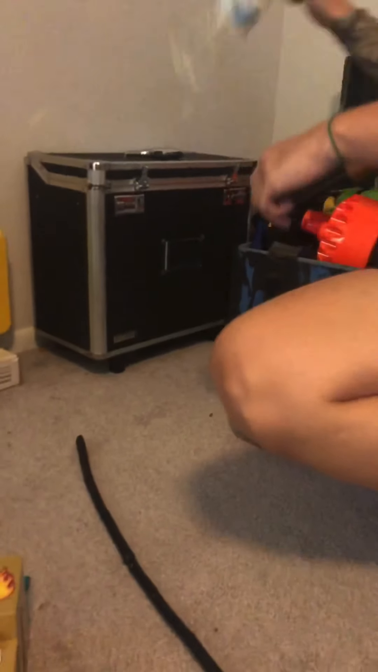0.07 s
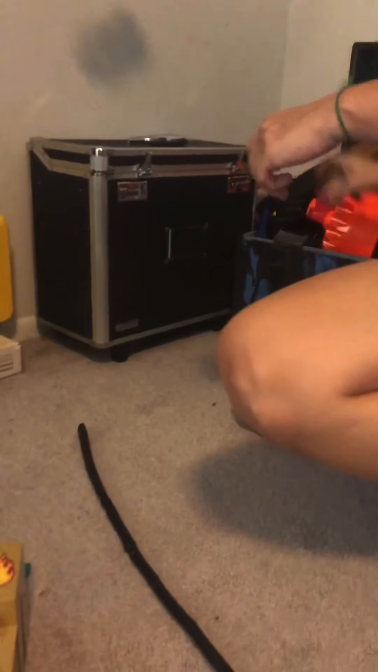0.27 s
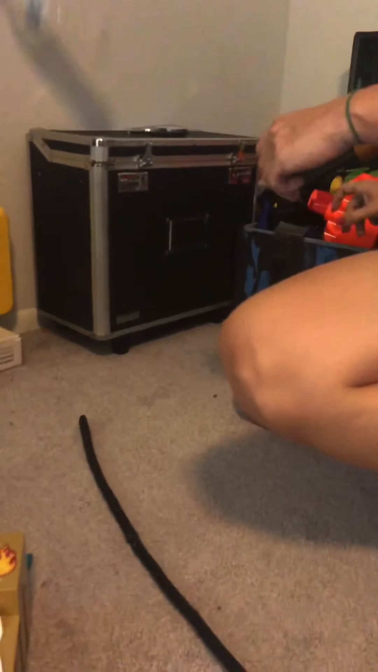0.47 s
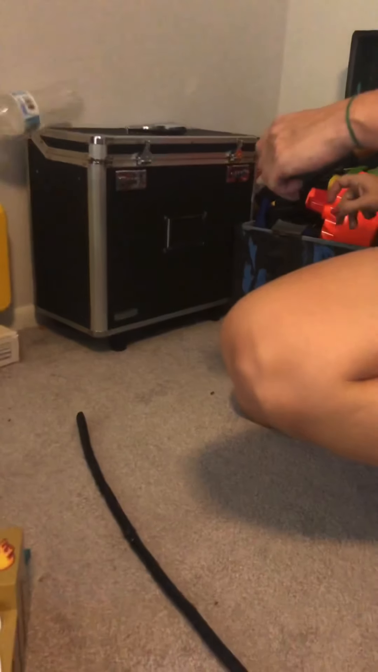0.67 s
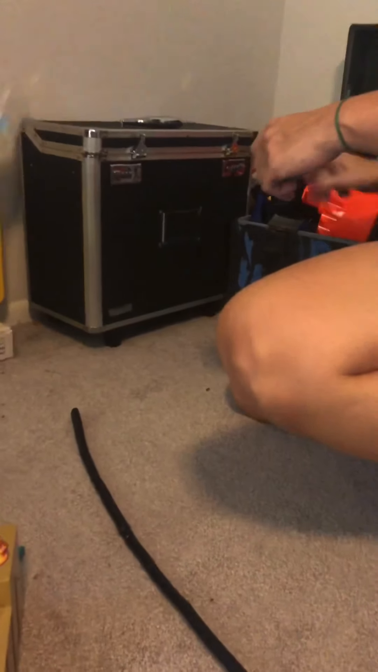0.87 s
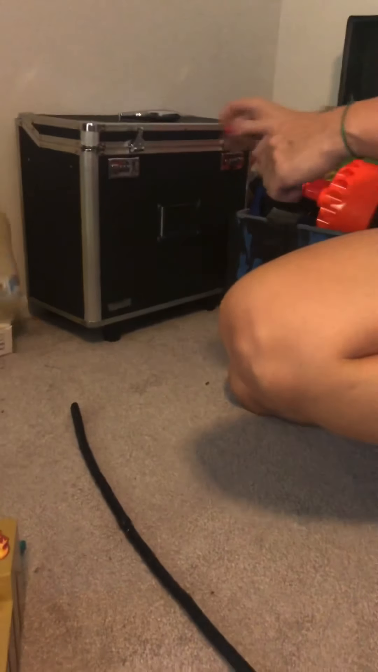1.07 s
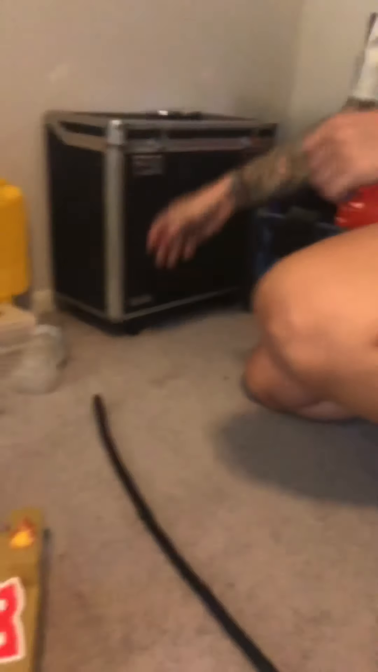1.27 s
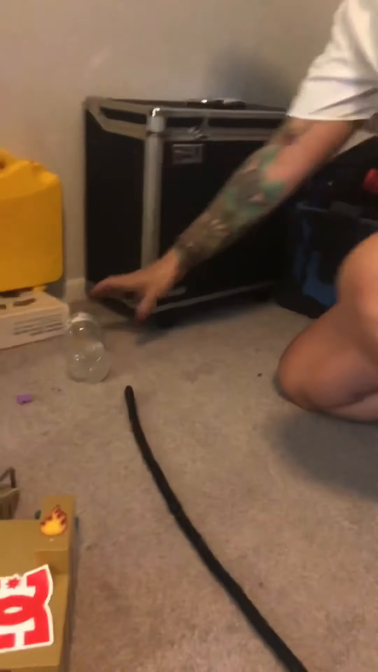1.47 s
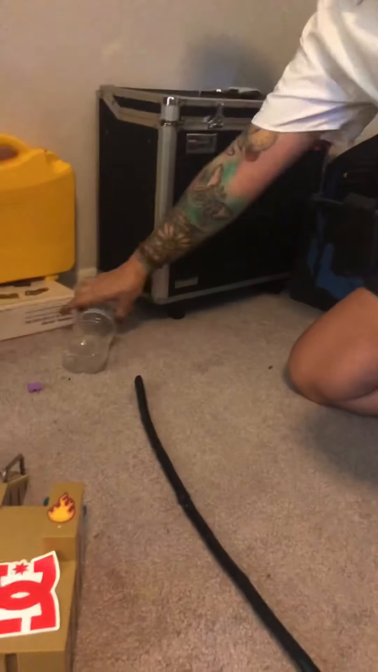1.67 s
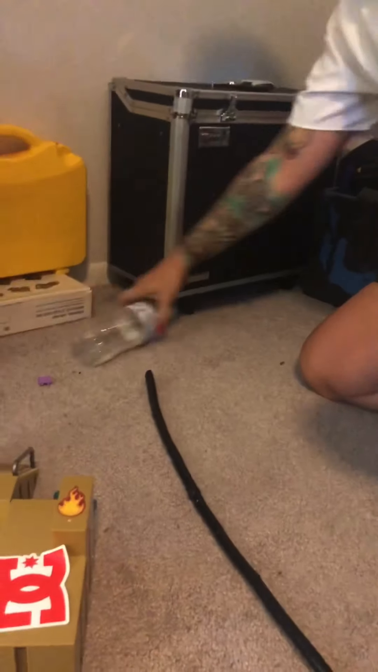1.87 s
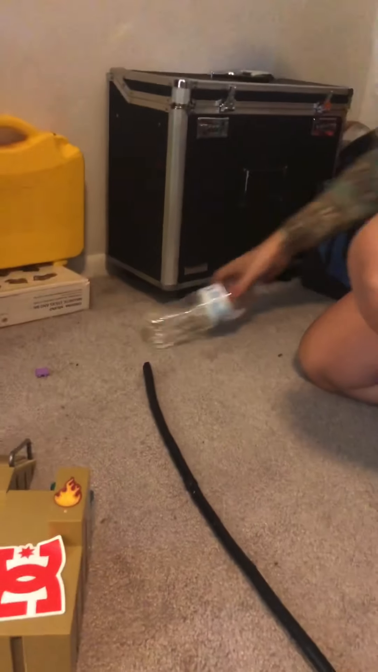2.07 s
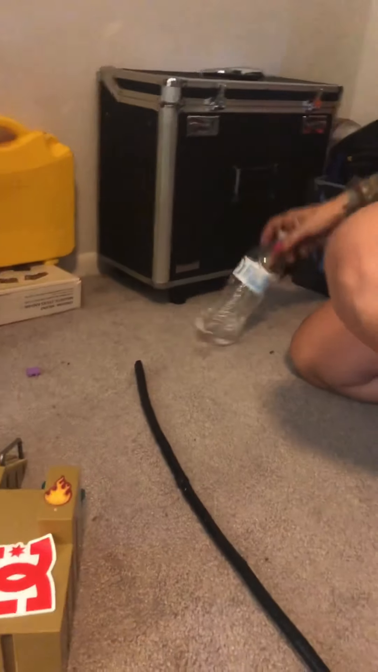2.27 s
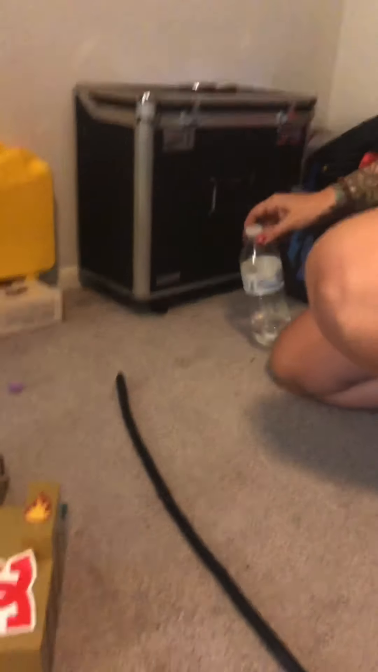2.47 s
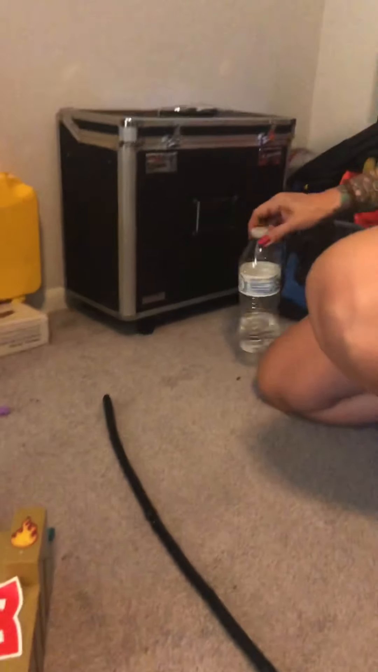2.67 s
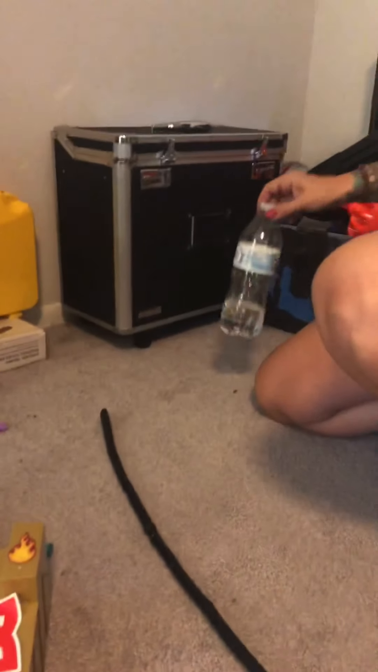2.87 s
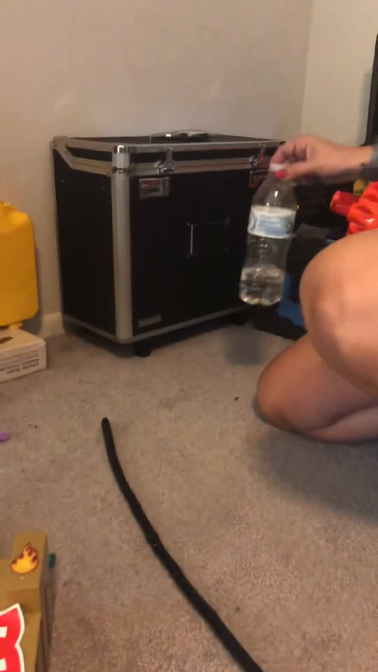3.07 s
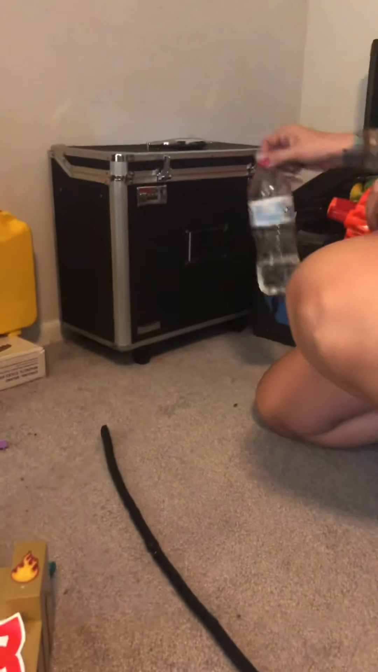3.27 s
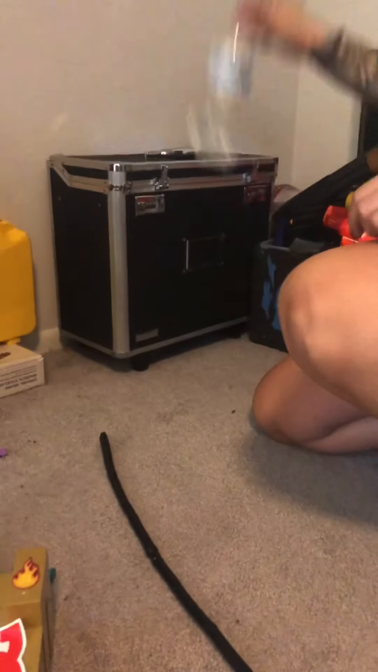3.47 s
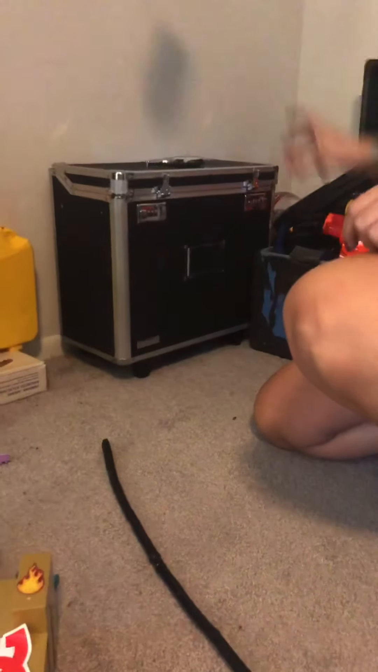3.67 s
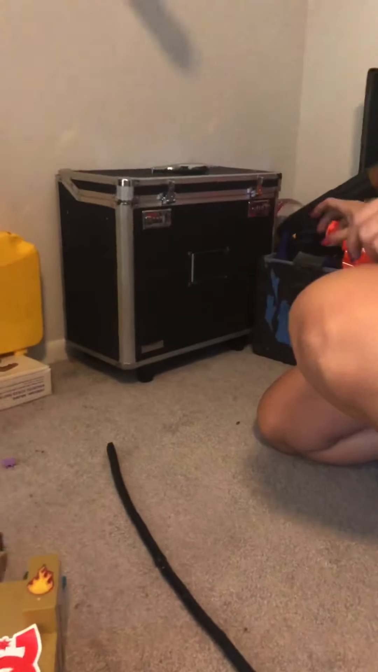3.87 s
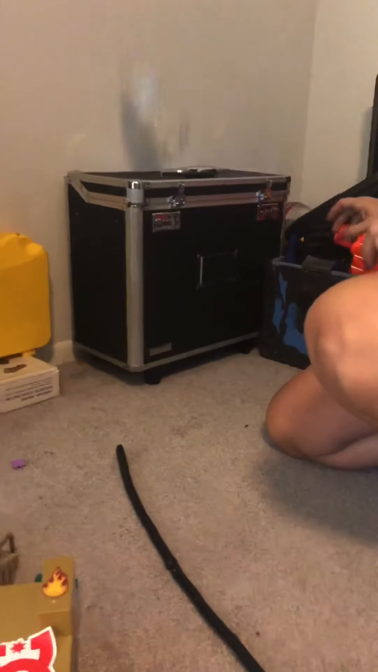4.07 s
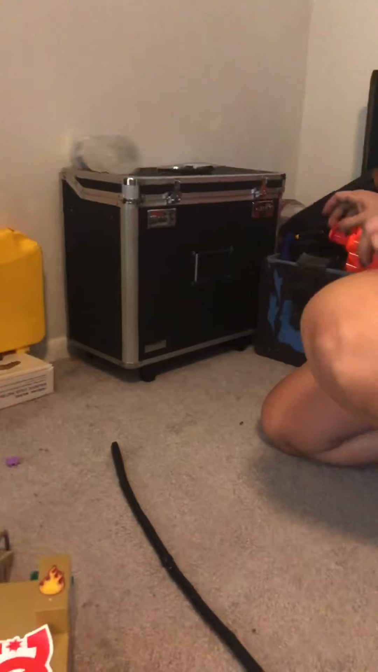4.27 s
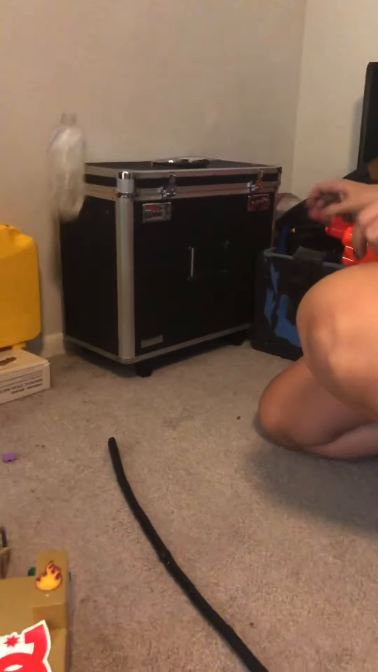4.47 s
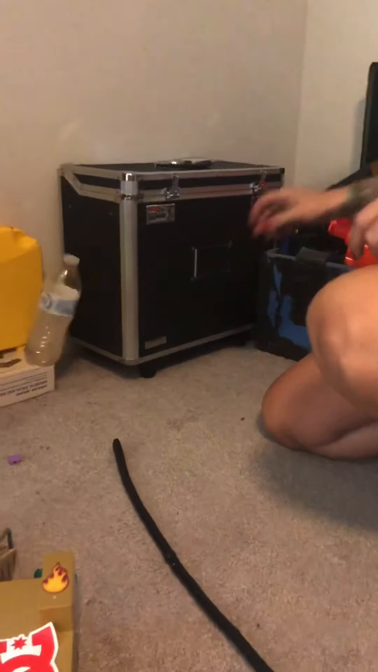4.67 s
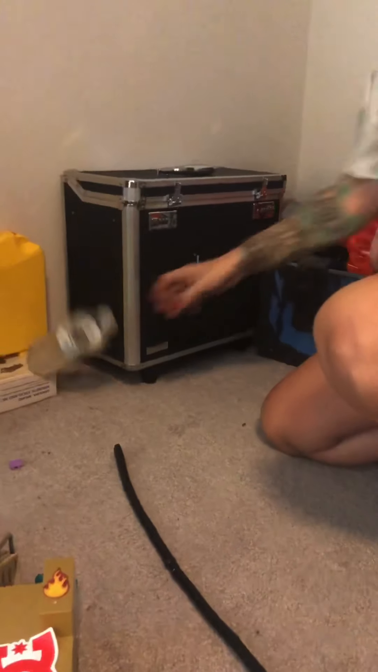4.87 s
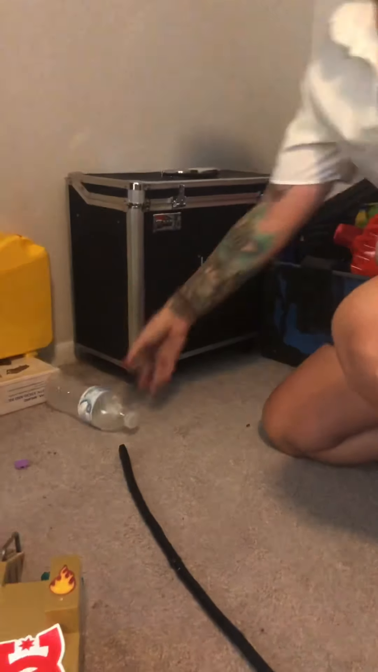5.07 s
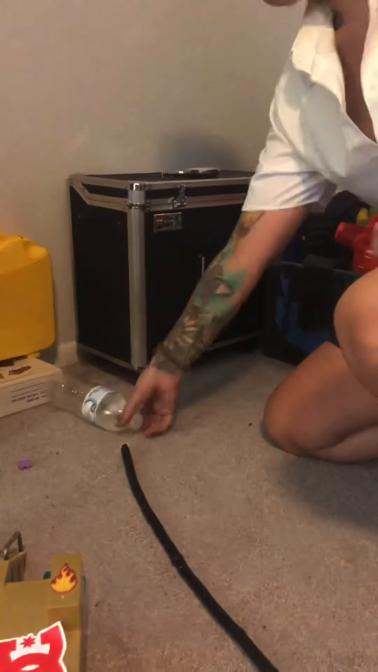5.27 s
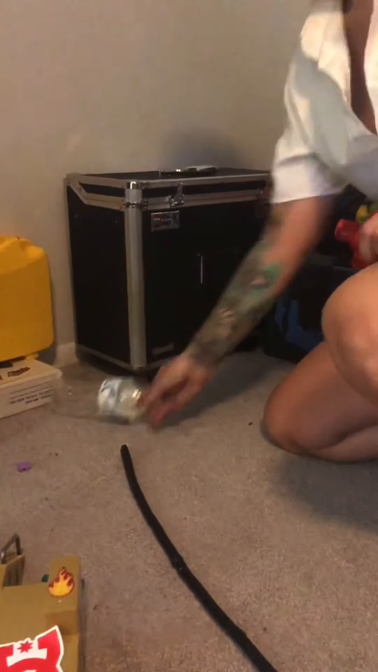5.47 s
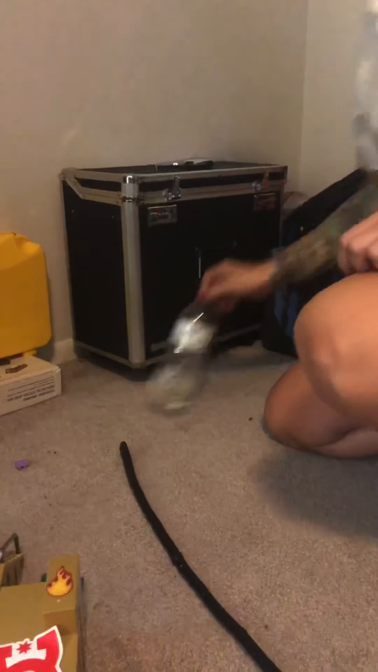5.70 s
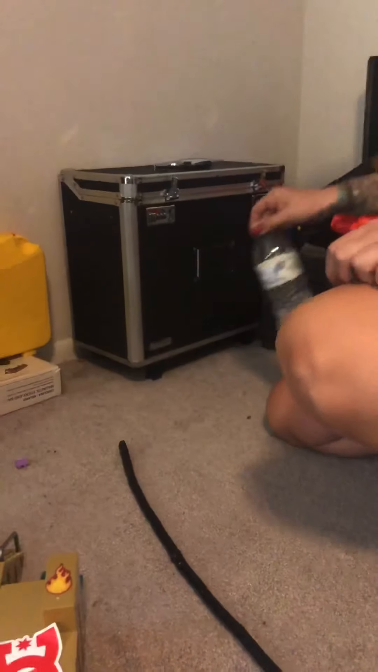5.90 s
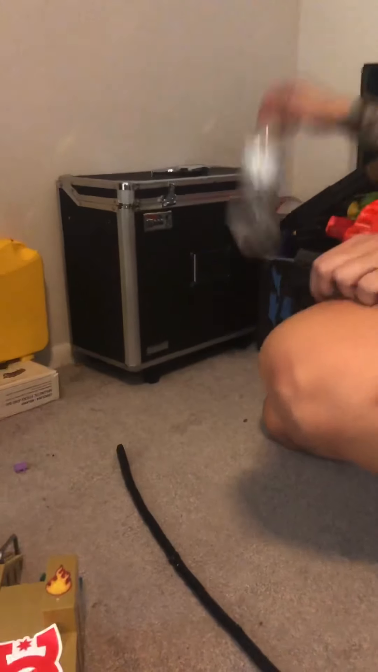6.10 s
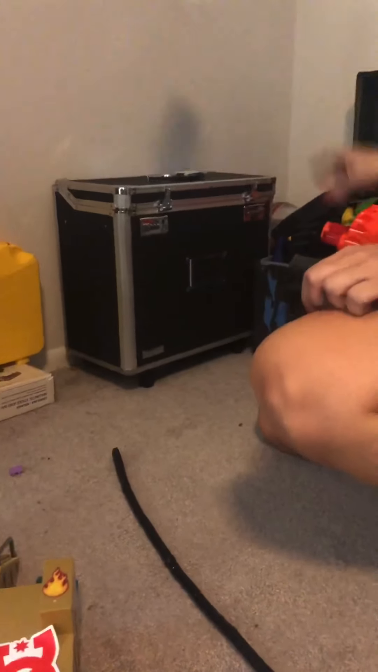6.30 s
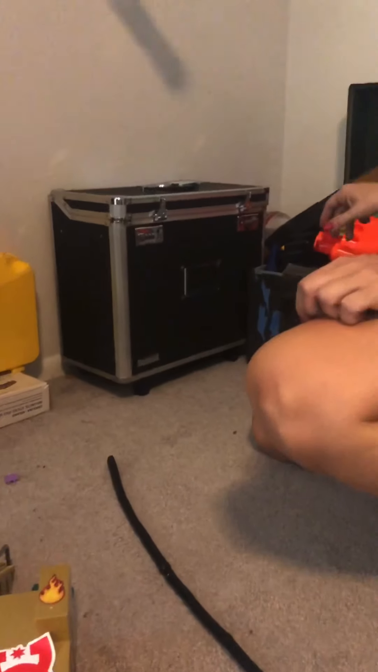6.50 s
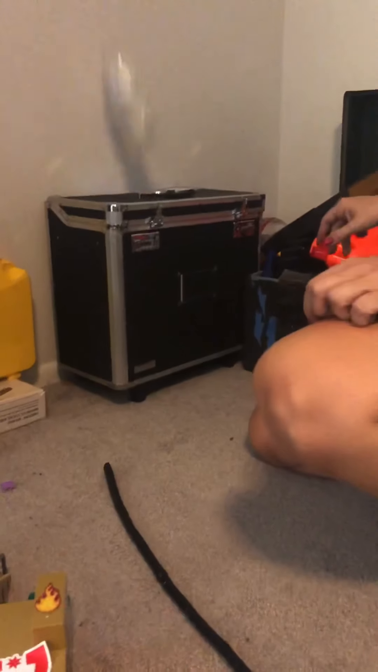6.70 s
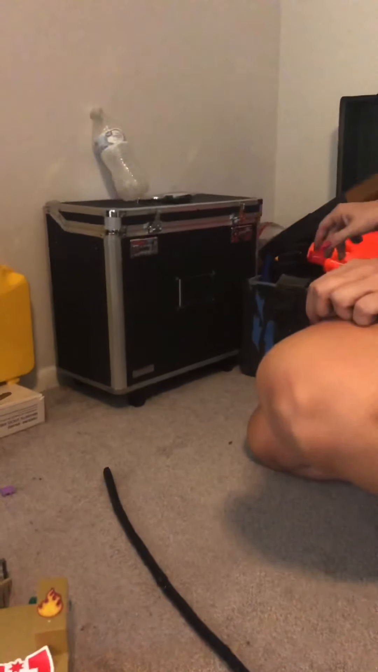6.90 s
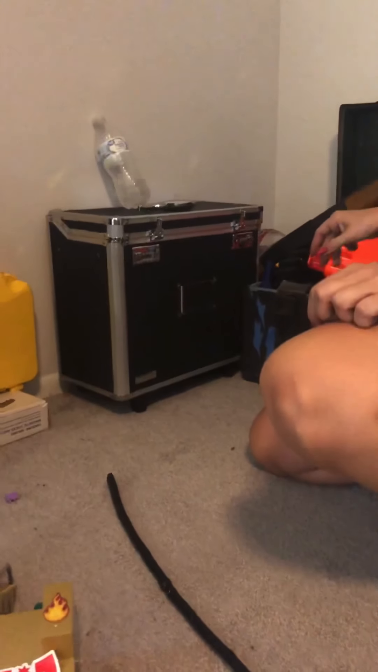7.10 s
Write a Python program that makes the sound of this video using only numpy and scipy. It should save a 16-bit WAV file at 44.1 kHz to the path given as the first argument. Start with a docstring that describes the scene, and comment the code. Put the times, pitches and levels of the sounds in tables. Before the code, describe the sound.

Quiet room with soft low ventilation and faint hum. Quick water slosh, then a cluster of hollow plastic knocks and thumps on a case lid, wall and carpet, each with crackling shell and a water slap. Soft handling follows, then a pause. Another flip bangs the lid and drops to the floor. Light crinkling and rustling, then a last flip thumps the lid with a brief metal latch rattle and settles. Handheld phone nearby, small dry room.

```python
"""A soft ventilation rumble and hum, a quick slosh, then a part-filled thin plastic bottle hits a flight case.
It is flipped three times in a small carpeted room: twice it knocks on the lid and tumbles to the floor,
the third time it stays on the lid. Grain swarms crackle the crushed shell, damped modes thump and knock,
a falling ring makes each water slap; short rising rings make the bubbles and the cap's tick on the wall.
Hands crinkle the bottle between throws, sleeves rustle as filtered noise, and decaying noise echoes it all."""
import sys
import numpy as np
from scipy import signal
from scipy.fft import rfft, irfft
from scipy.io import wavfile
from scipy.ndimage import uniform_filter1d

SR = 44100
rng = np.random.default_rng(int(sys.argv[2]) if len(sys.argv) > 2 else 0)


def generate_wav(sig):
    """Save sig (samples, or channels by samples) to the path in sys.argv[1] as 16-bit PCM at SR."""
    pcm = np.round(np.clip(np.atleast_2d(sig).T, -1, 1) * 32767).astype(np.int16)
    wavfile.write(sys.argv[1], SR, pcm)


N = 315005
TIME = np.arange(N) / SR
SHORT = TIME[:SR // 2]  # the half second that one event may last

# ventilation colour: pitch_hz, relative_level_db
ROOM_TONE_COLOUR = [(15, -38), (25, -11), (53, -2.5), (92, -8.5), (123, -7.5), (263, -17), (451, -17.5),
                    (560, -26.5), (659, -24), (1070, -29.5), (1160, -23), (1650, -45.5), (1940, -37.5),
                    (14000, -57.5), (16000, -52)]
# room reverb: pitch_hz, t60_s, level_db against the direct sound
ROOM_REVERB = [(80, 0.3, -4.5), (158, 0.25, -4), (324.4, 0.35, -1.5), (870, .27, -5.5), (2500, 0.35, -10.5),
               (6000, .3, -6.5), (14000, 0.25, -8)]
# standing waves between the walls: pitch_hz, t60_s, level_db
STANDING_WAVES = [(87, 0.84, -7), (126, 0.97, -20), (157, 0.29, -12)]
# colour of sleeve and skin friction: pitch_hz, relative_level_db
CLOTH_COLOUR = [(200, -6), (700, -2.5), (2000, -4), (4000, -6), (8000, -9), (13000, -9.5), (16000, -11.5)]
# arm reaching out or drawing back: start_s, length_s, level_db
ARM_REACHES = [(1.046, 0.42, -64), (1.47, 0.97, -67.5), (2.95, 0.19, -72.5), (4.276, 0.72, -69),
               (4.805, 0.44, -68), (5.308, 0.091, -64), (5.55, 0.11, -67.5), (6.028, 0.091, -69)]
# short chirping blips: the cap's tick against the wall (first row), then the loudest bubbles;
# before the mix trim in blips(): start_s, level_db, pitch_hz
LOUD_BLIPS = [(0.4282, -32, 3420), (4.5227, -51.5, 2970), (4.857, -47, 3980), (5.1184, -43.5, 4190),
              (5.631, -43, 3960), (5.7177, -49, 3700), (6.1063, -49.5, 5560), (6.248, -47.5, 4000),
              (6.528, -48.5, 4200), (7.0273, -46.5, 2700)]
# throws; the water changes ends at every half turn: release_s, half_turn_s, slosh_db
FLIPS = [(0.111, 0.15, -58), (3.576, 0.17, -52), (6.212, .154, -50)]
# slosh offset_db at the release, after half a turn, after a whole turn
TURN_OFFSETS_DB = [-10, -0.5, -13.5]
# a hand lifts or rights the bottle: start_s, length_s, slosh_db, crinkle_db
HAND_LIFTS = [(1.648, 0.12, -71, -50), (2.22, 0.2, -75, -53), (5.56, .2, -62, -53)]
# colour of the thin plastic shell: pitch_hz, relative_level_db
SHELL_COLOUR = [(200, -16), (450, 0.5), (750, 0.5), (1200, 0), (1800, 1), (2400, -3.5), (3100, 0),
                (4000, -4.5), (6000, -6.5), (9000, -10.5), (13000, -13.5), (16000, -24)]
# loudest dents snapping in or out: start_s, level_db, pitch_hz
LOUD_DENTS = [(0.2579, -32, 2380), (0.6318, -24, 5600), (1.022, -28.5, 9040), (1.253, -29, 3500),
              (1.677, -39, 2150), (1.6917, -35.5, 4060), (1.743, -43, 3980), (1.7768, -31, 3130),
              (2.298, -47, 3500), (2.3152, -43, 5050), (2.415, -42.5, 5000), (3.749, -47, 4060),
              (3.8169, -38, 9500), (3.84, -40, 10000), (4.198, -16.5, 8950), (5.022, -32, 5500),
              (5.5365, -34.5, 11000), (5.59, -39, 5380), (5.6302, -38.5, 9150), (6.384, -34, 2940),
              (6.428, -42.5, 9000)]
# flight case panel modes, ringing freely: pitch_hz, relative_level_db, free_t60_s
CASE_MODES = [(521, -3, 0.28), (622, -4, .18), (770, 0.5, 0.064), (1010, 2, 0.14), (1060, -1, .2),
              (1288, -15, .18), (1475, -8, .18), (1840, -2, .17), (2127, -5.5, 0.089), (2220, -13.5, 0.13)]
# metal latch modes, before the cap in lid(): pitch_hz, relative_level_db, free_t60_s
LATCH_MODES = [(9730, 4, 0.15), (9860, 7.5, 0.22), (12750, 2, 0.16)]
# blows on the lid: start_s, panels_db, latches_db
LID_HITS = [(.558, -41.5, -51), (4.108, -34, -52.5), (4.199, -61, -54), (6.7755, -27.5, -29.5)]
# water slamming shut on a pocket of air:
# start_s, settled_pitch_hz, level_db, t60_s, click_db, case_contact (0 to 1)
WATER_SLAPS = [(0.4422, 783, -15.5, 0.0066, -15.5, 0.2), (0.5644, 780, -9.5, 0.0036, -10.5, 1),
               (0.989, 936, -21, 0.0086, -34, 0.1), (1.08, 657, -18, 0.0032, -19.5, 0.2),
               (4.141, 834, -6, .018, -6.5, 0.9), (4.745, 980, -42.5, 0.021, -56, .06),
               (6.8115, 834, -11.5, 0.0087, -24.5, 0.92)]
# water's weight booming in the bottle and what lies under it: pitch_hz, relative_level_db, t60_s
THUMP_MODES = [(106, 1.5, 0.073), (199.5, -1, 0.028), (348.8, -1.5, 0.048)]
# hits on lid, wall or carpet; a softer contact pushes at a lower pitch:
# start_s, crush_db, crush_decay_s, thump_db, push_hz
IMPACTS = [(0.4412, -38.5, 0.0035, -24.5, 205), (.5555, -22.5, 0.012, -11, 154),
           (.623, -37, 0.014, -29.5, 150), (.8218, -39, 0.0051, -31.5, 200), (.982, -38, 0.0038, -50, 300),
           (.9895, -24.5, .011, -12.5, 307), (1.0785, -19, 0.0039, -16.5, 218),
           (1.246, -38, .026, -30.5, 186), (4.1045, -24.5, 0.027, -17.5, 169),
           (4.141, -29, 0.013, -18.5, 270), (4.191, -36, .005, -22.5, 170),
           (4.6527, -26, 0.018, -19.5, 237), (4.991, -44.5, 0.02, -33.5, 215),
           (5.036, -44.5, 0.025, -34.5, 237), (6.7665, -22, 0.015, -9, 159.4)]

ARM_ATTACK_S, ARM_RELEASE_S, ARM_REST_DB = 0.062, 0.095, -75
SETTLE_S, SETTLE_DB, SETTLE_HZ = 0.21, -53.5, 3750  # shaken water goes on bubbling
SLOSH_RISE_S, SLOSH_DECAY_S, SLOSH_TILT_DB = 0.0032, 0.022, 0.73  # tilts are in dB per octave
LIFT_RISE_SHARE, LIFT_DECAY_SHARE, LIFT_TILT_DB = 0.12, 0.55, -2  # shares of the lift's length
CRINKLE_HZ = 5260  # small dents under the fingers
DENT_SPREAD_DB, CHURN_SPREAD_DB = 5, 7  # unevenness of the grains
LATCH_LONGEST_T60_S, PANEL_T60_SHARE = 0.04, 0.25
CRUSH_RISE_SHARE, CRUSH_TILT_DB = 0.15, 0.64  # rise as a share of the decay
REBOUND_DB, REBOUND_AFTER_S, REBOUND_DECAY_S, REBOUND_TILT_DB = -22, 0.014, 0.024, -0.5
THUMP_LAG_CYCLES, PUSH_FALL_DB = 0.6, 14  # loss per octave between mode and push


def undb(db):
    """Decibels to gain."""
    return 10 ** (np.asarray(db) / 20)


def unit(x):
    """Scale to rms 1."""
    return x / np.sqrt(np.mean(x ** 2))


def add(out, start_s, x):
    """Mix x into out at its start time."""
    i = max(int(start_s * SR), 0)
    out[i:i + len(x)] += x[:max(len(out) - i, 0)]


def band(x, lo_hz, hi_hz, order=2):
    """Causal band-pass."""
    edges = [lo_hz, min(hi_hz, SR / 2 - 1000)]
    return signal.sosfilt(signal.butter(order, edges, "band", fs=SR, output="sos"), x)


def colour(x, points, tilt_db=0):
    """Minimum-phase filter of unit power through (Hz, dB) points, tilted by dB per octave."""
    size = 4096
    hz, db = np.transpose(points)
    tilted_db = db + tilt_db * np.log2(hz / hz[0])
    octave = np.log2(np.maximum(np.fft.rfftfreq(size, 1 / SR), 1))
    cepstrum = irfft(np.log(undb(np.interp(octave, np.log2(hz), tilted_db))))
    # folding the cepstrum forward in time makes the filter causal
    cepstrum[1:size // 2] *= 2
    cepstrum[size // 2 + 1:] = 0
    response = irfft(np.exp(rfft(cepstrum)))
    return signal.fftconvolve(x, response / np.linalg.norm(response))[:len(x)]


def fade(t60):
    """Exponential ring-down, 60 dB in t60 seconds."""
    return np.exp(-np.log(1000) * SHORT / t60)


def ring(hz, t60, rise, glide=0, glide_s=0.001):
    """A damped resonance swells while it is pushed; its pitch starts off by the share glide and settles."""
    t = SHORT[SHORT < 2 * t60]
    swell = np.exp(-np.log(1000) * t / t60) * (1 - np.exp(-(t / rise) ** 2))
    pitch = hz * (1 + glide * np.exp(-t / glide_s))
    tone = np.sin(2 * np.pi * np.cumsum(pitch) / SR)
    return np.pad(swell / swell.max() * tone, (0, len(SHORT) - len(t)))


def grains(size, spread_db):
    """Dense clicks of very unequal strength, even in power over a few milliseconds."""
    clicks = rng.standard_normal(size) * undb(spread_db * rng.standard_normal(size))
    return clicks / np.sqrt(uniform_filter1d(clicks ** 2, size=400) + 1e-9)


def sprinkle(start_s, length_s, db, hz, count, spread_db=3, spread_octaves=0.42):
    """Strew small events loosely over a stretch of time, as rows of start_s, level_db, pitch_hz."""
    when = start_s + length_s * (np.arange(count) + rng.random(count)) / count
    loud, size = rng.standard_normal((count, 2)).T
    return list(zip(when, db + spread_db * loud, hz * 2 ** (spread_octaves * size)))


def background(air_db=-58, hum_db=-66, hum_hz=120, waver_db=2):
    """Ventilation rumbles as coloured noise beside a mains hum whose level wavers."""
    air = unit(colour(rng.standard_normal(N), ROOM_TONE_COLOUR)) * undb(air_db)
    waver = waver_db * unit(band(rng.standard_normal(N), 1, 6, order=1))
    hum = np.sqrt(2) * np.sin(2 * np.pi * hum_hz * TIME)
    return air + undb(hum_db + waver) * hum


def echoes(first_echo_s=0.0061, build_s=0.0037, echo_spread_db=4):
    """Near walls scatter sound into a short tail, fading by band; standing waves hold the bass."""
    hz, t60, db = np.transpose(ROOM_REVERB)
    scatter = rfft(grains(len(SHORT), echo_spread_db))
    bins = np.fft.rfftfreq(len(SHORT), 1 / SR)
    edges = 44 * 2 ** np.arange(0, 9.1, 0.5)  # half octaves
    arrival = np.clip((SHORT - first_echo_s) / build_s, 0, 1)
    tail = np.zeros(len(SHORT))
    for lo, hi in zip(edges, edges[1:]):
        centre = np.log(lo * hi) / 2
        band_t60 = np.interp(centre, np.log(hz), t60)
        band_db = np.interp(centre, np.log(hz), db)
        part = irfft(scatter * ((bins >= lo) & (bins < hi)), len(SHORT)) * fade(band_t60) * arrival
        width_gain = np.sqrt(2 * (hi - lo) / SR)  # each band's share of a flat spectrum
        tail += part / np.sqrt(np.sum(part ** 2)) * width_gain * undb(band_db)
    for mode_hz, mode_t60, mode_db in STANDING_WAVES:
        decay = fade(mode_t60)
        tail += undb(mode_db) * 2 * np.sin(2 * np.pi * mode_hz * SHORT) * decay / decay.sum()
    return tail


def rustle(flutter_db=2.5):
    """Cloth friction: a fine hiss swells with each move of the arm, catching and letting go."""
    effort = np.full(N, undb(ARM_REST_DB))
    for start_s, length_s, db in ARM_REACHES:
        attack = np.clip((TIME - start_s) / ARM_ATTACK_S, 0, 1)
        release = np.exp(-np.maximum(TIME - start_s - length_s, 0) / ARM_RELEASE_S)
        effort = np.maximum(effort, undb(db) * attack * release)
    catch = unit(band(rng.standard_normal(N), 4, 35, order=1))
    fibres = grains(N, 5)
    return colour(fibres, CLOTH_COLOUR) * effort * undb(flutter_db * catch)


def blip(hz, t60=0.012, glide=-0.11):
    """One short rising chirp, as of a small bubble nearing the surface."""
    return ring(hz, t60, rise=0.00022, glide=glide, glide_s=0.0055)


def blips(table, count=12, scatter_s=0.01, spread_octaves=0.43, main_db=-2, small_db=-11):
    """A bubble or the cap's tick chirps, and softer chirps higher and lower ring after it."""
    out = np.zeros(N)
    for start_s, db, hz in table:
        add(out, start_s, undb(db + main_db) * blip(hz))
        for late, size in zip(rng.random(count), rng.standard_normal(count)):
            small_hz = min(hz * 2 ** (spread_octaves * size), SR / 3)
            add(out, start_s + late ** 2 * scatter_s, undb(db + small_db) * blip(small_hz))
    return out


def sloshes():
    """Water runs along the wall, briefly in flight and slowly in the hand; rows as for crackle()."""
    rows = []
    for release_s, half_turn_s, db in FLIPS:
        for k, turn_db in enumerate(TURN_OFFSETS_DB):
            start_s = release_s + k * half_turn_s
            rows.append((start_s, db + turn_db, SLOSH_RISE_S, SLOSH_DECAY_S, SLOSH_TILT_DB))
    for start_s, length_s, db, _ in HAND_LIFTS:
        rows.append((start_s, db, LIFT_RISE_SHARE * length_s, LIFT_DECAY_SHARE * length_s, LIFT_TILT_DB))
    return rows


def froth(count=26, centre_hz=4200, spread_octaves=0.7, bubble_db=-3):
    """Each slosh folds in many tiny bubbles; a duller slosh makes larger ones."""
    out = np.zeros(N)
    for start_s, db, rise, decay, tilt_db in sloshes():
        for late, size, loud in zip(rng.random(count), *rng.standard_normal((2, count))):
            hz = min(centre_hz * 2 ** (spread_octaves * size + 0.38 * tilt_db), SR / 3)
            gain = undb(db + bubble_db + 1.4 * loud)
            add(out, start_s + late * (rise + 2 * decay), gain * blip(hz))
    return out


def dents(table, snap_t60=0.016, shell_db=-5, stiffness_db=1.5):
    """A dent pops through with a snap; the smaller its panel, the higher and brighter it is."""
    out = np.zeros(N)
    for start_s, db, hz in table:
        snap = grains(len(SHORT), DENT_SPREAD_DB) * fade(snap_t60)
        shell = colour(snap, SHELL_COLOUR, stiffness_db * np.log2(hz / 4000))
        panel = band(snap, hz / 1.3, hz * 1.1, order=1)
        pop = undb(shell_db) * shell + panel
        add(out, start_s, undb(db) * 4 * pop / np.linalg.norm(pop))  # equal energy for equal level
    return out


def lid(ring_db=-5, rattle_db=1, rattle_t60=0.1):
    """The panels knock, damped by the bottle on them; small steel catches rattle and ring briefly."""
    out = np.zeros(N)
    knock = sum(undb(db) * ring(hz, PANEL_T60_SHARE * t60, rise=0.001) for hz, db, t60 in CASE_MODES)
    jingle = sum(undb(db + ring_db) * ring(hz, min(t60, LATCH_LONGEST_T60_S), rise=0.00091)
                 for hz, db, t60 in LATCH_MODES)
    for start_s, panels_db, latches_db in LID_HITS:
        rattle = unit(band(grains(len(SHORT), 2), 9300, 15000)) * fade(rattle_t60) * undb(rattle_db)
        add(out, start_s, undb(panels_db) * knock + undb(latches_db) * (jingle + rattle))
    return out


def slaps(aside_db, rise=0.0015, click_hz=2400, click_t60=0.0027, shell_db=-13, shell_t60=0.09,
          case_db=-36, churn_db=-18, churn_t60=0.11):
    """Water's shock clicks the shell, trapped air rings downward, and the churn shakes what it stands on."""
    out = np.zeros(N)
    case = sum(undb(case_db + mode_db) * ring(mode_hz, mode_t60, rise=0.002)
               for mode_hz, mode_db, mode_t60 in CASE_MODES)
    for start_s, hz, db, t60, click_db, contact in WATER_SLAPS:
        shock = -ring(click_hz, click_t60, rise=0.0001)
        shell_grains = grains(len(SHORT), 1.2) * fade(shell_t60)
        shell = colour(shell_grains, SHELL_COLOUR, tilt_db=-3.5) * undb(shell_db)
        pocket = undb(aside_db) * ring(hz, t60, rise, glide=0.46, glide_s=0.0013)
        churn = unit(band(grains(len(SHORT), CHURN_SPREAD_DB), 840, 2500)) * fade(churn_t60) * undb(churn_db)
        body = pocket + churn + contact * case
        add(out, start_s, undb(db) * body + undb(click_db) * (shock + shell))
    return out


def crushes():
    """Each landing crushes the shell, which springs back more softly; rows as for crackle()."""
    rows = []
    rebound_rise = CRUSH_RISE_SHARE * REBOUND_DECAY_S
    for start_s, db, decay, _, _ in IMPACTS:
        rows.append((start_s, db, CRUSH_RISE_SHARE * decay, decay, CRUSH_TILT_DB))
        rows.append((start_s + REBOUND_AFTER_S, db + REBOUND_DB, rebound_rise, REBOUND_DECAY_S,
                     REBOUND_TILT_DB))
    return rows


def crackle(table, spread_db):
    """Swarms of tiny shell clicks swell and die away: start_s, level_db, rise_s, decay_s, tilt_db per octave."""
    out = np.zeros(N)
    for start_s, db, rise, decay, tilt_db in table:
        swell = np.minimum(SHORT / rise, 1) * np.exp(-np.maximum(SHORT - rise, 0) / decay)
        swarm = grains(len(SHORT), spread_db) * swell
        add(out, start_s, undb(db) * colour(swarm, SHELL_COLOUR, tilt_db))
    return out


def thumps(rise_cycles=0.97, surge_db=-25, surge_t60=0.19, surge_ratio=1.5):
    """Modes near the push's pitch answer most, low notes come later, and the water surges on unevenly."""
    out = np.zeros(N)
    for start_s, _, _, db, push_hz in IMPACTS:
        for hz, mode_db, t60 in THUMP_MODES:
            gain = undb(db + mode_db - PUSH_FALL_DB * abs(np.log2(hz / push_hz)))
            add(out, start_s + THUMP_LAG_CYCLES / hz, gain * ring(hz, t60, rise_cycles / hz))
        surge = unit(band(grains(len(SHORT), 2), push_hz / surge_ratio, push_hz * surge_ratio))
        add(out, start_s, undb(db + surge_db) * surge * fade(surge_t60))
    return out


def bottle(snaps, chirps, aside_db=0):
    """Bottle and case sounding in one direction; thumps and air pocket carry less to the sides."""
    landings = crackle(crushes(), spread_db=4.0) + undb(aside_db) * thumps() + slaps(aside_db) + lid()
    sloshing = crackle(sloshes(), spread_db=3.5) + froth()
    return landings + dents(snaps) + blips(chirps) + sloshing


def scene(wall_count=4):
    """Mix the direct sound with the walls' echoes, each wall hearing its own draw of the crackle."""
    arm = rustle()
    snaps = list(LOUD_DENTS)
    for start_s, length_s, _, crinkle_db in HAND_LIFTS:
        snaps += sprinkle(start_s, length_s, crinkle_db, CRINKLE_HZ, count=6)
    chirps = list(LOUD_BLIPS)
    for start_s, *_ in list(WATER_SLAPS) + list(HAND_LIFTS):
        chirps += sprinkle(start_s, SETTLE_S, SETTLE_DB, SETTLE_HZ, count=3)
    walls = np.zeros(N)
    for _ in range(wall_count):
        toward_wall = bottle(snaps, chirps, aside_db=-2.5) + arm
        walls += signal.fftconvolve(toward_wall, echoes())[:N] / np.sqrt(wall_count)
    return (bottle(snaps, chirps) + arm + walls + background())[None]


def record(dry):
    """The phone microphone sheds the deep bass, rounds the loudest peaks and cuts the top."""
    thinned = signal.sosfilt(signal.butter(8, 43, "high", fs=SR, output="sos"), dry)
    ceiling = 0.6
    rounded = ceiling * np.tanh(thinned / ceiling)
    return signal.sosfilt(signal.ellip(10, 0.2, 80, 15900, fs=SR, output="sos"), rounded)


dry = scene()
out = record(dry)
generate_wav(out)
```